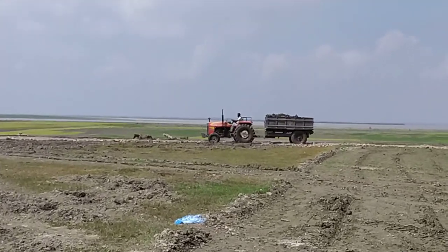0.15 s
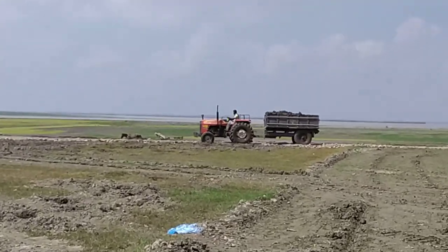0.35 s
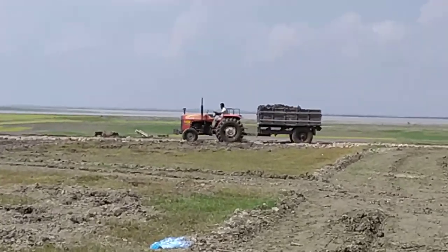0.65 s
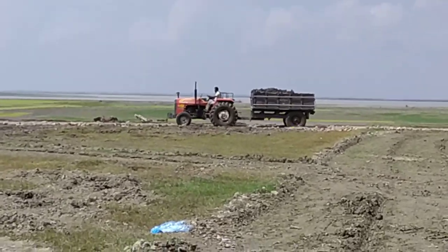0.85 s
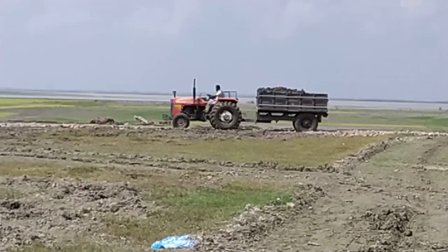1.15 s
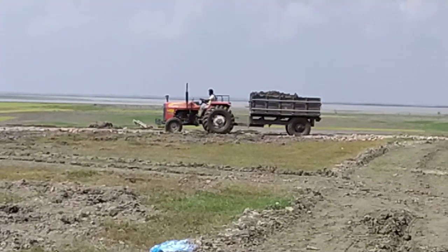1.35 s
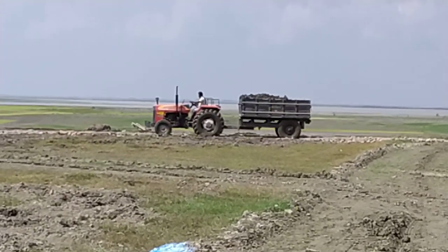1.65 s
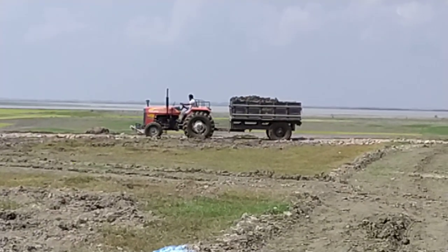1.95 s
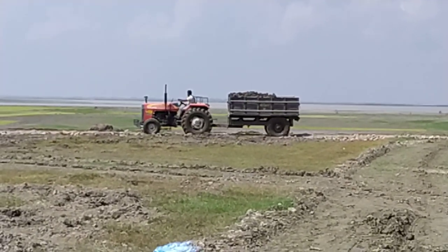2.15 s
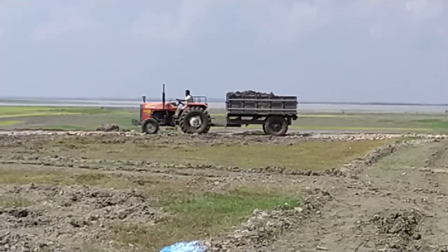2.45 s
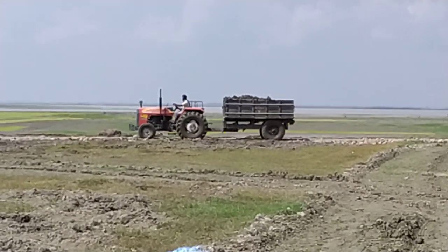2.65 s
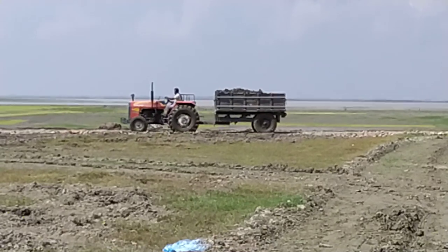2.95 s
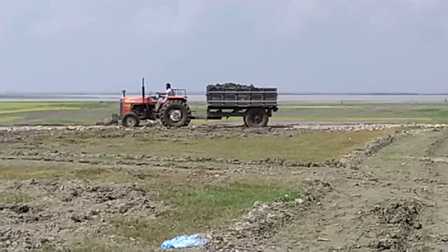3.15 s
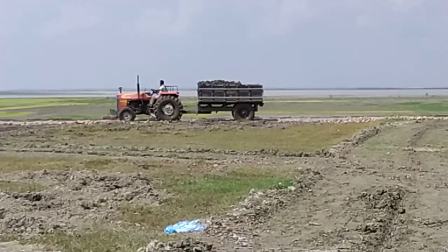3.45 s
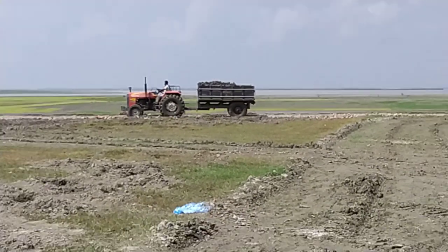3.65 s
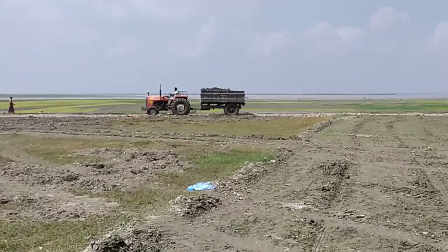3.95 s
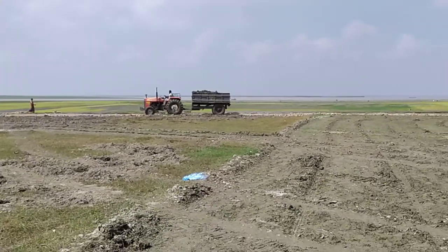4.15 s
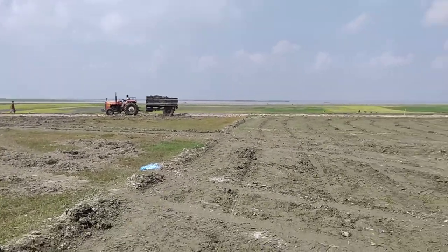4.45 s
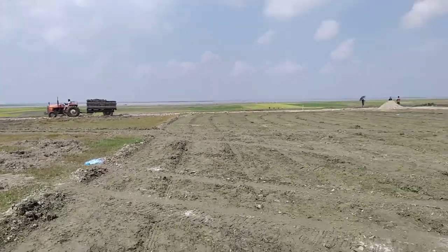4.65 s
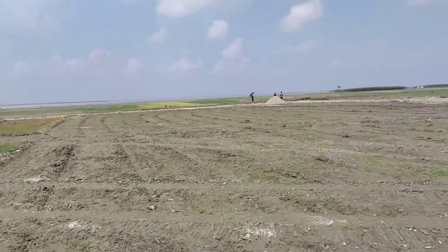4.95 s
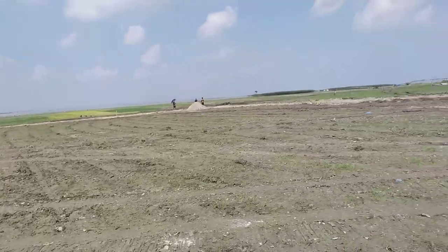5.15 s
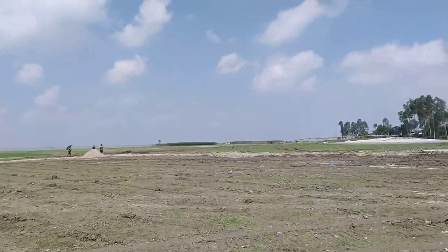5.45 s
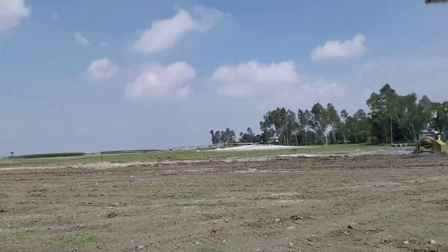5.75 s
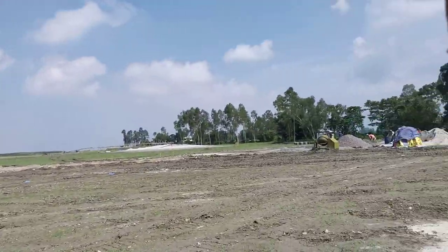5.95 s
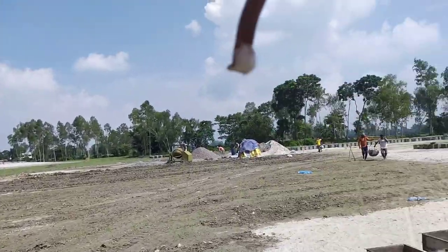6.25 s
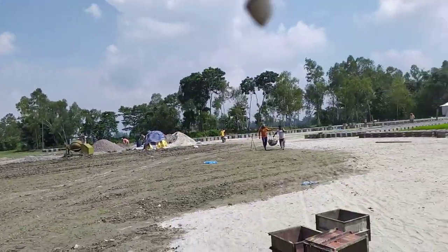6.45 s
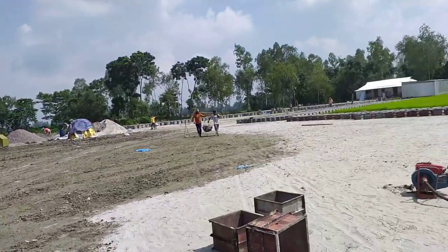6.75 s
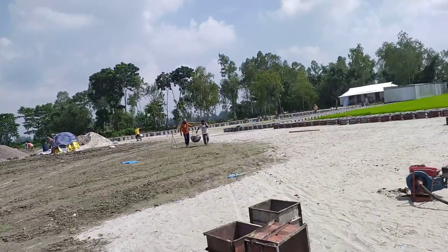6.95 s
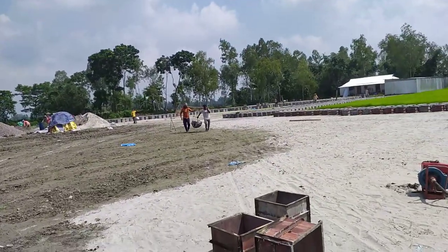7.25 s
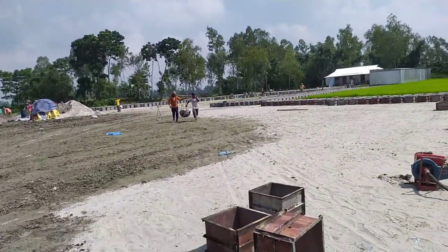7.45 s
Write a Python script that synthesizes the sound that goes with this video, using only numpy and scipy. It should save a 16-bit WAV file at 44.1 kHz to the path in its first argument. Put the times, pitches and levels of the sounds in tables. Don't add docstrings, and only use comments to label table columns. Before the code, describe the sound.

Close by in an open yard, a small engine drives a shrill, rough steel whine that swells and shifts as the camera turns, with faint handling scuffs.

```python
import sys
import numpy as np
from scipy import signal
from scipy.fft import rfft, irfft, next_fast_len
from scipy.io import wavfile
from scipy.ndimage import uniform_filter1d, minimum_filter1d

SR = 44100
rng = np.random.default_rng(int(sys.argv[2]) if len(sys.argv) > 2 else 0)


def magnitude_from_level(level_db):
    exponent = np.asarray(level_db, float) / 20
    return 10 ** exponent


def dump(signal):
    limited = np.clip(np.atleast_2d(signal).T, -1, 1)
    pcm = np.round(limited * 32767).astype(np.int16)
    wavfile.write(sys.argv[1], SR, pcm)


N = 335160
TIME = np.arange(N) / SR
ORBITS_PER_TURN = 4.205
OPEN_DB = -11

# [t/s, facing/0-1]
FACING = [
    (0, 0.09),
    (4.4, 0),
    (6.2, 0.55),
    (7.6, 1),
]
# [t/s, lag/ms]
ENGINE_LAG = [
    (0, 0.05),
    (4.3, 0.32),
    (5.7, 0.12),
    (7.6, 0.056),
]
# [t/s, left level/dB, right level/dB, left f/Hz, right f/Hz]
PORTS = [(0.0, -22, -8, 5400, 5700), (0.45, -16.5, -5.5, 5440, 5510), (0.76, -19, -8, 5500, 5870),
         (1.0, -3.5, -8.5, 5460, 5600), (1.3, -0.5, -7, 5600, 6170), (1.7, -1.5, -10, 5350, 5700),
         (2.27, -7, -12, 5520, 5800), (2.72, -3.5, -7.5, 5460, 5930), (3.17, -14, -9.5, 5530, 5700),
         (3.55, -6, -7.5, 5490, 6460), (4.35, -5.5, -10.5, 5200, 5850), (4.75, -3.5, -11, 5780, 6260),
         (5.02, -3, -10.5, 5500, 6000), (5.52, -6, -6.5, 6050, 6050), (5.72, -14.5, -8.5, 6300, 6400),
         (6.08, -8.5, -7, 6130, 5900), (6.55, -12, -10.5, 5550, 6300), (7.6, -15.5, -14.5, 5800, 5830)]


def evened(x):
    return x / np.sqrt(np.mean(x ** 2, -1, keepdims=True) + 1e-20)


def steady(x):
    power = uniform_filter1d(uniform_filter1d(x ** 2, 8000), 8000)
    return x / np.sqrt(power + 1e-12)


def curves(rows, t):
    s, *columns = np.transpose(rows)
    return np.array([np.interp(t, s, c) for c in columns])


def read(points, hz):
    f, value = np.transpose(points)
    return np.interp(np.log(hz + 1), np.log(f + 1), value)


def drift(t, rate_hz, count):
    f = np.geomspace(rate_hz / 12, rate_hz, num=16)
    phase = rng.random((count, 16, 1))
    return evened(sum(np.sin(2 * np.pi * (f[k] * t + phase[:, k])) / np.sqrt(f[k]) for k in range(16)))


def ring(x, modes):
    size = next_fast_len(N + 4096)
    hz = np.fft.rfftfreq(size, 1 / SR)
    gain = sum((-1) ** k * magnitude_from_level(db) / (1 + 1.3j * (hz - f) / w) ** 2 for k, (f, w, db) in enumerate(modes))
    return irfft(rfft(x, size) * gain, size)[..., :N]


def held(x, ceiling):
    room = np.minimum(ceiling / (abs(x) + 1e-9), 1)
    return x * uniform_filter1d(minimum_filter1d(room, size=50), size=48)


def at_ports(law, t):
    base_db, slope, faced_db = np.reshape(law, (3, 2, 1))
    return base_db + slope * (curves(PORTS, t)[:2] - OPEN_DB) + faced_db * curves(FACING, t)


def ducked(law):
    db, slope, faced_db = law
    whine_db = curves(PORTS, TIME)[:2].mean(0) - OPEN_DB
    return db + slope * whine_db + faced_db * curves(FACING, TIME)[0] ** 2


def knocks(orbit, spots, swing_ms, uneven, jitter_ms, slip_ms, wander):
    # [t/s, lag/ms]
    poker_lag = [(0, 0.19), (.9, 0.2), (2, 0.23), (3, 0.18), (4.3, 0.2), (5, 0.21), (5.8, 0.21), (7.6, 0.2)]
    turns = np.arange(2, int(orbit[-1]) - 2)[:, None] + rng.random(spots)
    angle = 2 * np.pi * turns / ORBITS_PER_TURN + .3 * rng.standard_normal(spots)
    early_late_ms = swing_ms * np.cos(angle) + jitter_ms * rng.standard_normal(turns.shape)
    t = np.interp(turns, orbit, TIME) + early_late_ms / 1000
    t += slip_ms / 1000 * drift(t[:, 0], 14., count=1).T
    blow = 1 + uneven * np.sin(angle)
    out, reach = np.zeros((2, N)), np.arange(-6, 7)
    shared = rng.choice([-1., 1.], (spots, 1)) + wander * drift(t[:, 0], 2.2, count=spots)
    for port in (0, 1):
        seen = shared + .55 * drift(t[:, 0], 2., count=spots)
        at = (t + port * curves(poker_lag, t)[0] / 1000).ravel() * SR
        index = np.clip(np.round(at).astype(int)[:, None] + reach, 0, N - 1)
        off = index - at[:, None]
        click = np.sinc(off) * np.cos(np.pi * off / 14) ** 2
        shape = (blow * seen.T).reshape(-1, 1) * click
        out[port] = np.bincount(index.ravel(), shape.ravel(), N)
    return evened(out)


def ridge(x, lift_db, away_hz, faced_hz):
    hz, t, z = signal.stft(x, SR, nperseg=1024, noverlap=768)
    spread_hz = away_hz + (faced_hz - away_hz) * curves(FACING, t)
    shaded_db = 10.8 * curves(FACING, t) * np.clip((5650 - hz[:, None]) / 400, 0, 1)
    off = (hz[:, None] - curves(PORTS, t)[2:, None]) / spread_hz
    z = z * magnitude_from_level(lift_db * np.exp(-off ** 2) - shaded_db)
    return signal.istft(z, SR, nperseg=1024, noverlap=768)[1][:, :N]


def beating(x, orbit):
    # [f/Hz, width/Hz, level/dB]
    low_band = [(5330, 680, 0)]
    high_band = [(6080, 420, -5)]
    swell = np.cos(2 * np.pi * orbit / ORBITS_PER_TURN) * (1 - .55 * curves(FACING, TIME))
    return x + swell * ring(x, low_band + high_band)


def poker(orbit):
    # [f/Hz, width/Hz, level/dB]
    tube_modes = [(5050, 380, -11), (5740, 950, 0), (6500, 300, -18)]
    # [f/Hz, width/Hz, level/dB]
    thin_modes = [(6775, 80, 1), (7150, 400, -17), (7530, 220, -13), (7950, 400, -14), (8280, 100, -5),
                  (8440, 220, -8), (10300, 900, -12), (11000, 600, -8), (11610, 230, 0), (12700, 1500, -23),
                  (14200, 1300, -25), (15680, 500, -18)]
    # [f/Hz, width/Hz, level/dB]
    frame_modes = [(3780, 260, -37), (4080, 210, -37), (4310, 110, -34)]
    # [level/dB, slope/dB per dB of openness, change when faced/dB]
    casing_law = (-19.5, -10.5, 1, -0.06, -2.5, -4)
    blows = knocks(orbit, spots=8, swing_ms=.022, uneven=.5, jitter_ms=.004, slip_ms=.05, wander=.95)
    grind = rng.standard_normal((2, N)) * (1 + .5 * np.cos(2 * np.pi * orbit / ORBITS_PER_TURN))

    tube = ring(blows + .17 * grind, tube_modes)
    tube = steady(ridge(tube, lift_db=6.0, away_hz=370, faced_hz=273))
    tube = held(tube, 1.25)
    whine = magnitude_from_level(curves(PORTS, TIME)[:2] + 2.5) * beating(tube, orbit)

    top_tilt_db = np.array([[3.], [-3.]])
    tilted = [(f, w, db + (f > 9000) * top_tilt_db) for f, w, db in thin_modes]
    thin = ring(blows + 2. * grind, tilted)
    side_on = np.exp(-((curves(FACING, TIME) - .27) / 0.18) ** 2)
    glance_db = np.array([[4.], [1.]]) * side_on
    rattle = magnitude_from_level(at_ports(casing_law, TIME) + glance_db - 6.5) * steady(thin)

    frame = magnitude_from_level(18.0 - 3.5 * curves(FACING, TIME)) * ring(blows + 1.39 * grind, frame_modes)
    return whine + rattle + frame


def tones(orbit):
    # [multiple, left level/dB, right level/dB, change when faced/dB, left lead from behind/rad]
    orbit_tones = [(2, -38, -37, 10, .35), (3, -43, -43, 9, .7), (4, -47, -47, 11, 1.2),
                   (5.96, -36, -35, -4, 2.8), (6.42, -31.5, -29.5, -5, 3.1), (7.44, -38, -41, 2, -.3),
                   (8.39, -30, -33.5, -5, 1.2)]
    # [multiple of the firing rate, level/dB]
    exhaust_orders = [(1, -42), (2, -49.5), (3, -13), (4, -12.5), (5, -7.5), (6, -6), (7, -31), (8, -10.5),
                      (9, -17), (10, -38), (11, -13.5), (12, -3.5), (13, -11), (14, -22), (15, -8),
                      (16, -26), (17, -31), (18, -13), (19, -12), (20, -57), (21, -18.5), (22, -21),
                      (23, -42), (24, -16), (25, -20.5), (26, -44), (27, -39), (28, -62), (29, -51),
                      (30, -27.5)]
    # [level/dB, slope/dB per dB of whine, change when faced/dB]
    hum_law = (-21.5, -0.14, -1.2)
    exhaust_law = (-28, -0.3, 1.5)
    faced_lead, side_lead = .25, .5

    heard = orbit - np.array([[0], [1]]) * curves(ENGINE_LAG, TIME) * .27
    coarse = TIME[::256]
    facing = curves(FACING, coarse)[0]
    behind = np.maximum(1 - 6 * facing, 0)
    out = magnitude_from_level(ducked(hum_law) + 3.0) * np.cos(2 * np.pi * heard)
    loudness, phase = drift(coarse, 9., count=7), drift(coarse, 12., count=7)
    for (k, left_db, right_db, faced_db, lead), a, b in zip(orbit_tones, loudness, phase):
        late = behind * lead + (1 - behind) * (faced_lead + side_lead * k * (1 - facing))
        size = np.interp(TIME, coarse, magnitude_from_level(faced_db * facing + 1.5 * a))
        for port, db in enumerate((left_db, right_db)):
            shift = np.interp(TIME, coarse, .6 * b - port * late)
            out[port] += magnitude_from_level(db) * size * np.cos(2 * np.pi * k * orbit + shift)

    firing = orbit / ORBITS_PER_TURN / 2
    pipe = np.zeros(N)
    for (k, db), a in zip(exhaust_orders, drift(coarse, 8., count=len(exhaust_orders))):
        pipe += np.interp(TIME, coarse, magnitude_from_level(db + 1.9 * a)) * np.cos(2 * np.pi * k * firing + 0.297 * k)
    return out + magnitude_from_level(ducked(exhaust_law) + 1.0) * evened(pipe)


def clatter(orbit):
    # [f/Hz, level/dB per Hz]
    away_spectrum = [(18, -50), (30, -6), (129, -11.5), (181, -6), (228, -13.5), (449, -20.5), (544, -21.5),
                     (813, -27.5), (1210, -26), (1500, -20.5), (1700, -28.5), (2600, -20), (4050, -25.5),
                     (4700, -16.5), (6110, -15.5), (10300, -120)]
    # [f/Hz, level/dB]
    faced_change = [(300, 2), (750, 6), (1100, 10.5), (1500, 3.5), (2100, 14.5), (2900, -4), (3500, 6.5),
                    (5000, -5.5)]
    # [f/Hz, level/dB]
    left_over_right = [(100, -.5), (900, .5), (1400, 3), (2100, 2), (3000, 7), (4500, 2)]
    # [f/Hz, likeness/0-1]
    likeness = [(30, 0.28), (120, 0.9), (400, 0.95), (1200, 0.91), (2500, 0.043), (8000, 1)]
    # [f/Hz, lead/rad]
    bent_lead = [(900, 0), (1120, 1.), (1300, -2.2), (1600, -1.2), (2000, 0)]
    # [level/dB, slope/dB per dB of openness, change when faced/dB]
    engine_law = (-22, -18, 0.41, -0.36, -2, -6.5)
    # [facing/0-1, span of facing, f/Hz, width/Hz, level/dB]
    cowl_glance = (.36, 0.08, 1280, 103, 11)

    steps, hz = N // 256 + 5, np.fft.rfftfreq(1024, 1 / SR)[:, None]
    t = np.arange(steps) * 256 / SR
    a, b, c, d, patches = rng.standard_normal((steps, 513, 5)).T
    patches = uniform_filter1d(uniform_filter1d(patches, 10, 0), 20, 1)
    same, left = np.clip(read(likeness, hz), -1, 1), a + 1j * b
    behind = np.maximum(1 - 5 * curves(FACING, t), 0)
    late = np.exp(-2j * np.pi * hz * curves(ENGINE_LAG, t) / 1000 - 1j * read(bent_lead, hz) * behind)
    right = same * late * left + np.sqrt(1 - same ** 2) * (c + 1j * d)
    z = np.array([left, right])

    patch_db = 0.83 * patches / patches.std()
    z *= magnitude_from_level(read(away_spectrum, hz) + read(faced_change, hz) * curves(FACING, t) + patch_db)
    z *= magnitude_from_level(np.array([.5, -.5])[:, None, None] * read(left_over_right, hz) * (1 - curves(FACING, t)))
    shade = np.clip(np.log(hz / 400 + 1e-3), 0, 1)
    z *= magnitude_from_level(shade * (at_ports(engine_law, t)[:, None] + 28))
    facing, span, cowl_hz, cowl_width, db = cowl_glance
    z *= magnitude_from_level(db * np.exp(-((curves(FACING, t) - facing) / span) ** 2 - ((hz - cowl_hz) / cowl_width) ** 2))

    puff = 1 + 0.64 * np.exp(-(orbit / ORBITS_PER_TURN / 2 % 1) / 1.6)
    sound = signal.istft(z, nperseg=1024, noverlap=768)[1][:, :N]
    return magnitude_from_level(-21.0) * puff * sound / sound.std()


def taps():
    # [t/s, level/dB, f/Hz]
    finger_taps = [
        (4.334, -11, 1500),
        (4.68, -15, 2000),
        (7.37, -18, 1500),
    ]
    out, t = np.zeros(N), np.arange(1200) / SR
    for s, db, hz in finger_taps:
        band = signal.butter(1, [hz / 2, hz * 2], "band", fs=SR, output="sos")
        scuff = evened(signal.sosfilt(band, rng.standard_normal(len(t))))
        fade = magnitude_from_level(db - 60 * t / .04) * np.minimum(t / .002, 1)
        out[round(s * SR):][:len(t)] += fade * scuff
    return out


def scene():
    # [t/s, rotor orbit rate/Hz]
    governor = [(0.0, 182.5), (0.27, 182.6), (0.44, 180.9), (1.1, 180.8), (1.33, 182.5), (2.76, 182.4),
                (2.86, 180.8), (3.98, 181.2), (4.17, 179.6), (4.54, 179.7), (5.04, 182.6), (5.44, 182.5),
                (5.56, 181.1), (6.7, 180.8), (7.05, 182.6), (7.45, 180.8)]
    flutter_hz, flutter_away, flutter_turned = 9.5, .003, .0058
    slow = np.array([np.interp(TIME, TIME[::256], a) for a in drift(TIME[::256], 3., count=2)])
    turned = np.minimum(3 * curves(FACING, TIME)[0], 1)
    depth = flutter_away + (flutter_turned - flutter_away) * turned
    flutter = depth * (1 + .5 * slow[0]) * np.sin(2 * np.pi * flutter_hz * TIME + 2 * slow[1])
    speed = curves(governor, TIME)[0] / SR
    rotor_orbit = np.cumsum(speed * (1 + flutter))
    engine_orbit = np.cumsum(speed * (1 + .2 * flutter))
    scuffs = taps() * magnitude_from_level(np.array([[0], [-4]]))
    return poker(rotor_orbit) + tones(engine_orbit) + clatter(engine_orbit) + scuffs


def thinned(x, chance_db, from_hz, edge_hz):
    # [f/Hz, width/Hz,
    # level/dB]
    notches = [(4600, 130, -14), (5770, 100, -7), (4020, 70, -6), (6400, 130, -6), (5100, 60, -4)]
    # [f/Hz, level/dB]
    silence_floor = [(1700, -41), (2600, -38), (3500, -34.5), (5000, -34), (7500, -36), (9200, -43),
                     (11000, -38), (13000, -43)]
    hz, t, z = signal.stft(x, SR, nperseg=2048, noverlap=1536)
    notch_db = sum(db * np.exp(-((hz[:, None] - f) / w) ** 2) for f, w, db in notches)
    z *= magnitude_from_level((0.5 - curves(FACING, t)) * notch_db)
    bands = (abs(z[:, :1024]) ** 2).reshape(2, 128, 8, -1).mean(2)
    band_db = 10 * np.log10(uniform_filter1d(bands, size=3) / (8 * bands.sum(1).mean(0)) + 1e-12)
    luck = evened(uniform_filter1d(rng.standard_normal(band_db.shape), size=7))
    band_hz = hz[:1024:8, None]
    keep = (band_db > read(silence_floor, band_hz) + chance_db * luck) | (band_hz < from_hz)
    z[:, :1024] *= np.repeat(keep, 8, axis=1) * (hz[:1024, None] < edge_hz)
    return signal.istft(z, SR, nperseg=2048, noverlap=1536)[1][:, :N]


def roll_off(x):
    return signal.sosfilt(signal.butter(12, 16190, fs=SR, output="sos"), x)


def record(dry):
    x = signal.sosfilt(signal.butter(6, 40., "high", fs=SR, output="sos"), dry)
    x = thinned(held(x, .95), chance_db=4, from_hz=1600, edge_hz=15950)
    return roll_off(x)


dry = scene()
out = record(dry)
dump(out)
```